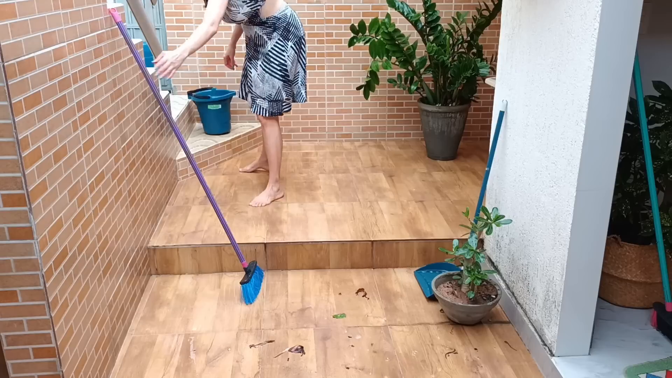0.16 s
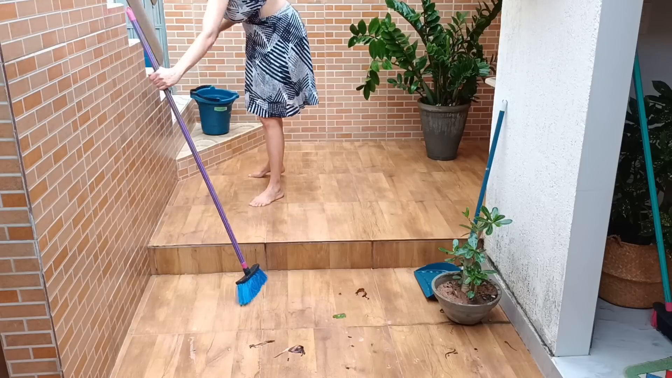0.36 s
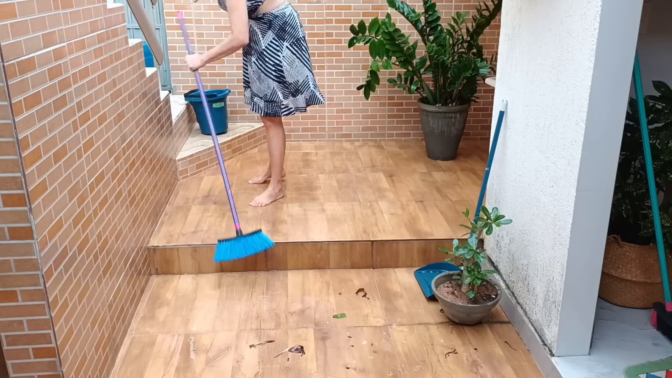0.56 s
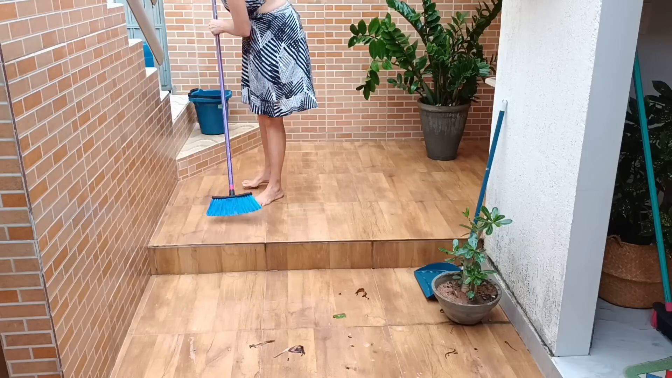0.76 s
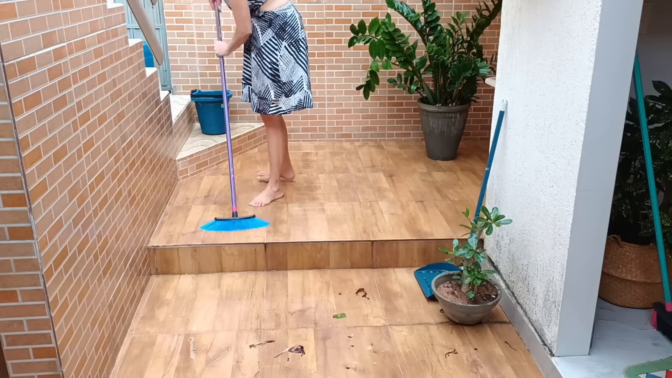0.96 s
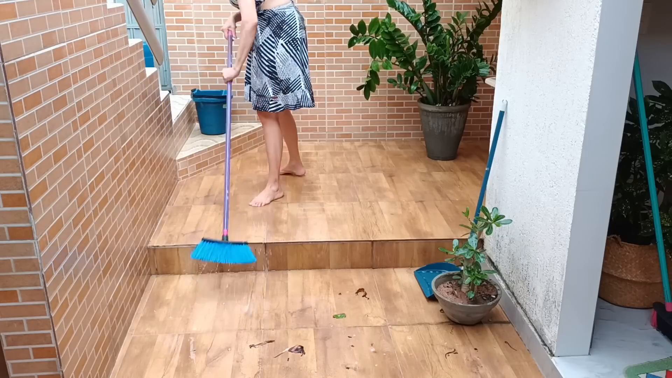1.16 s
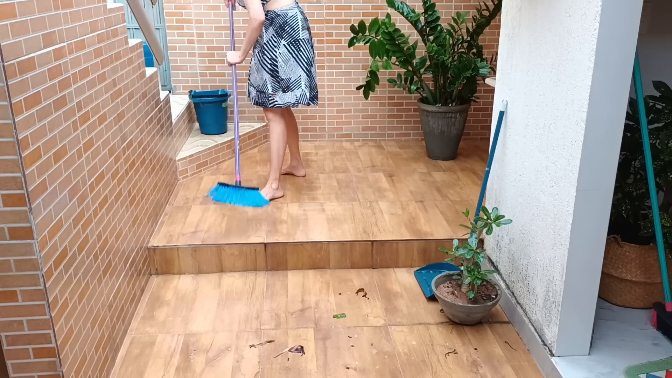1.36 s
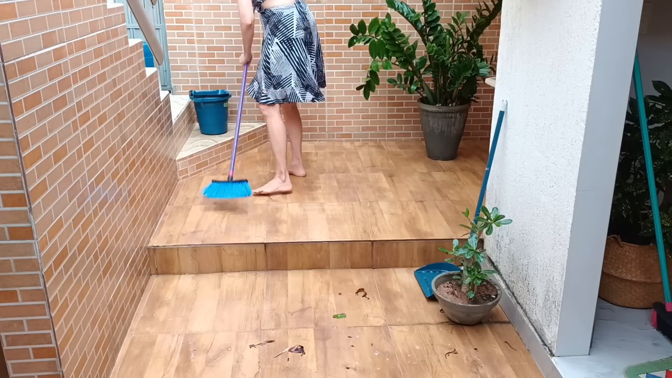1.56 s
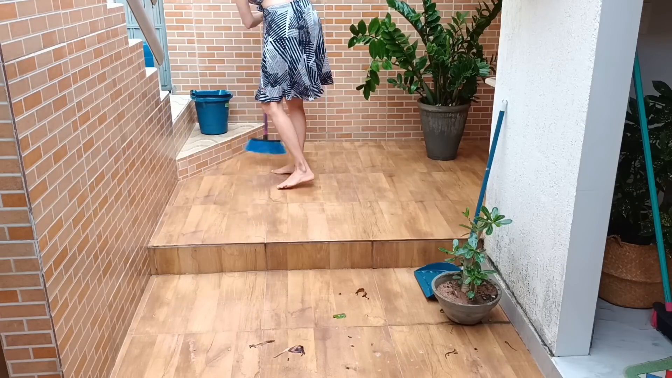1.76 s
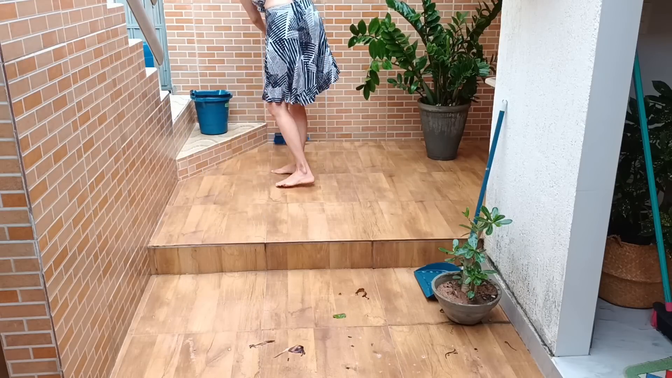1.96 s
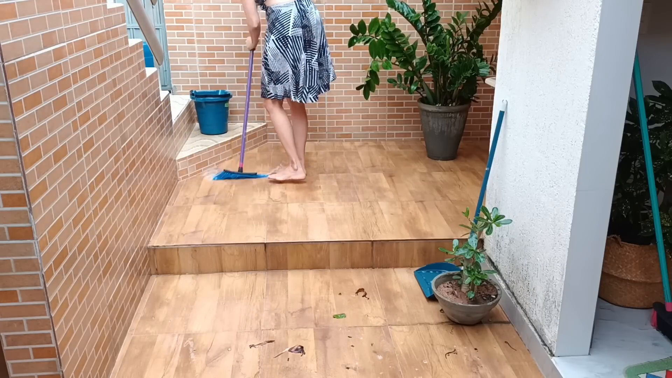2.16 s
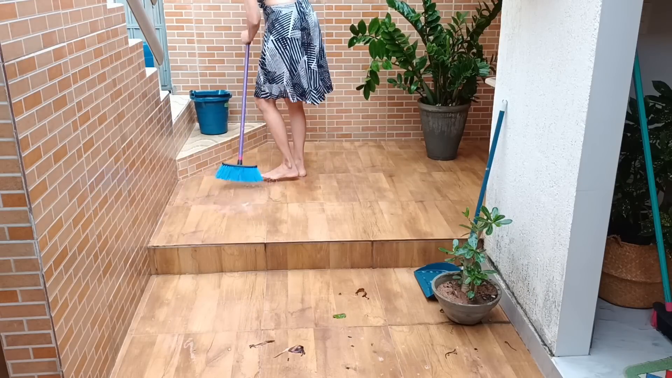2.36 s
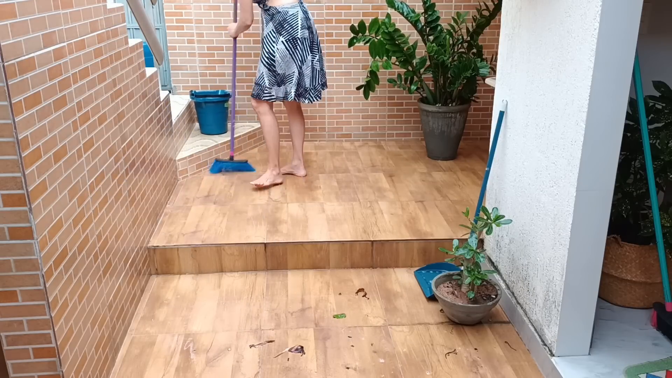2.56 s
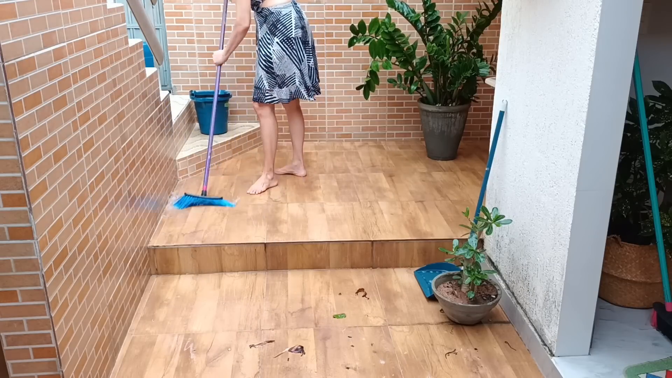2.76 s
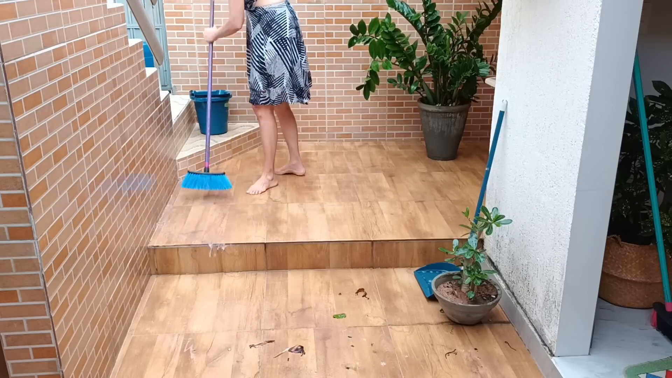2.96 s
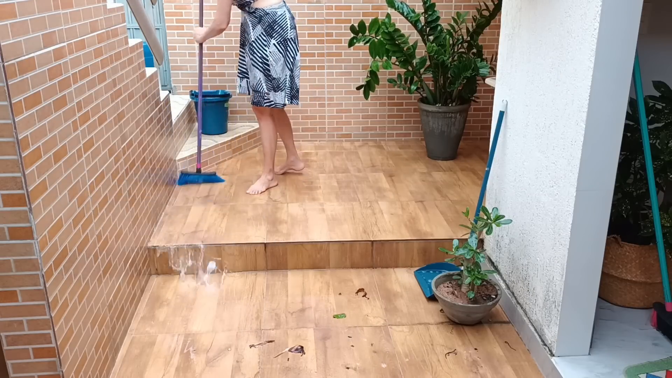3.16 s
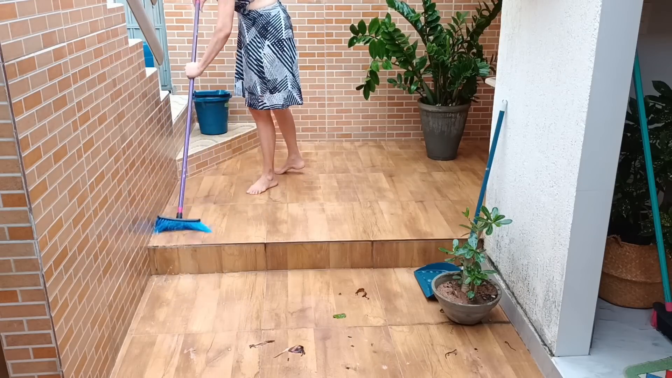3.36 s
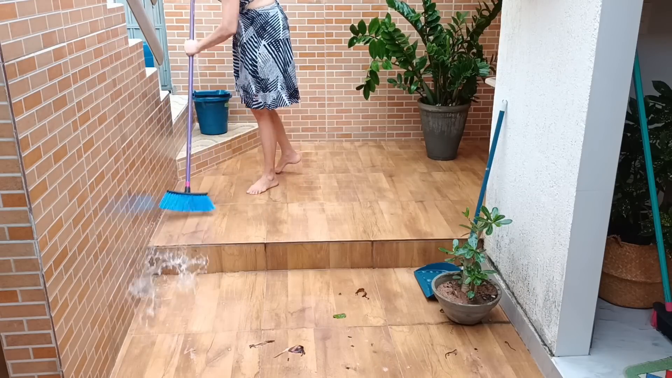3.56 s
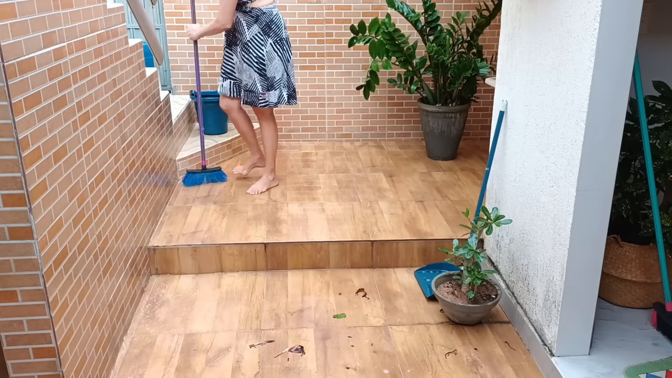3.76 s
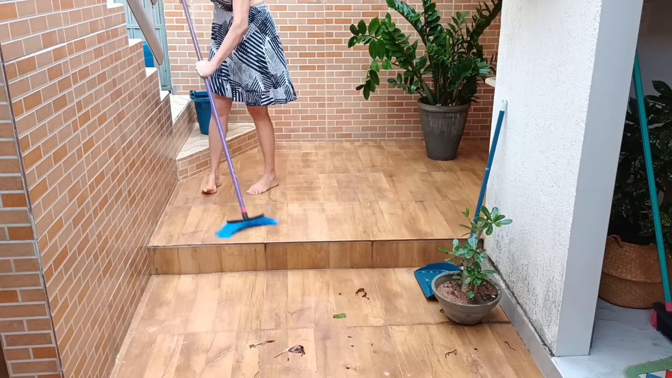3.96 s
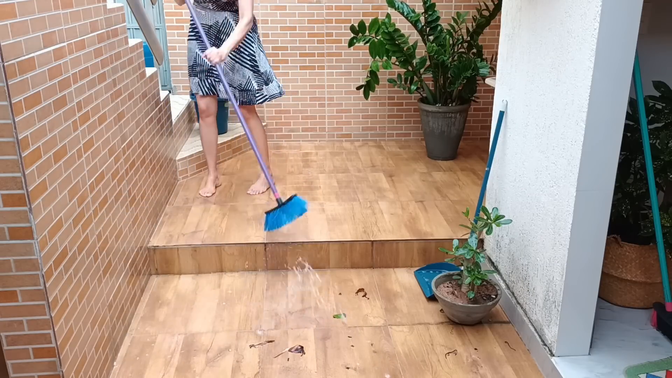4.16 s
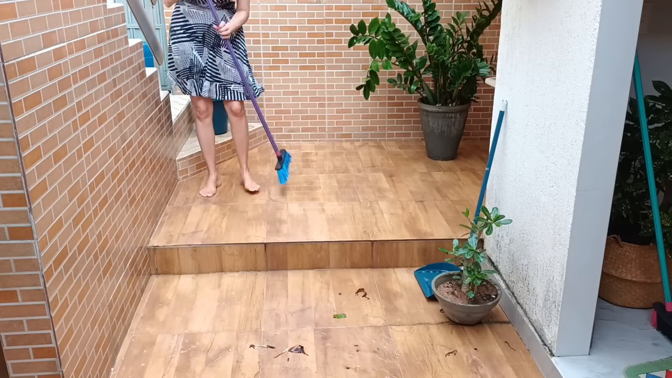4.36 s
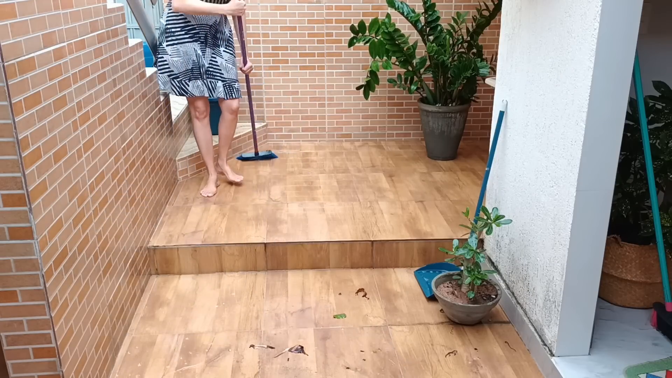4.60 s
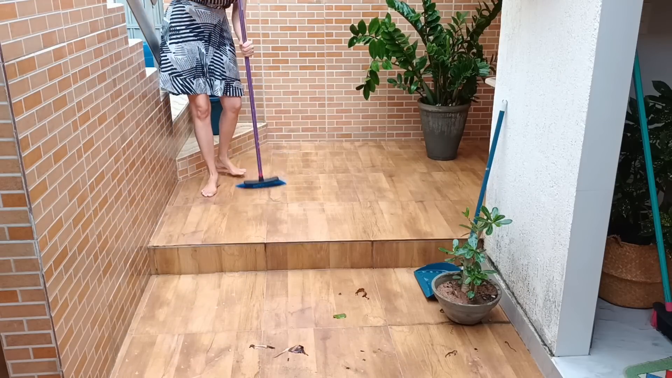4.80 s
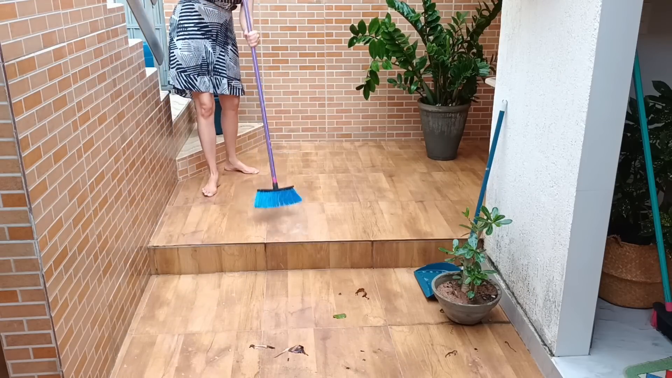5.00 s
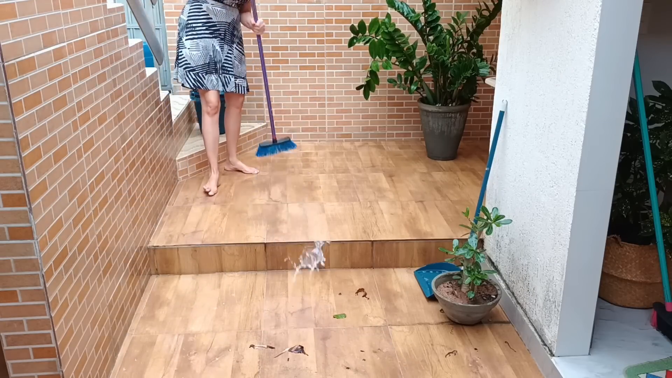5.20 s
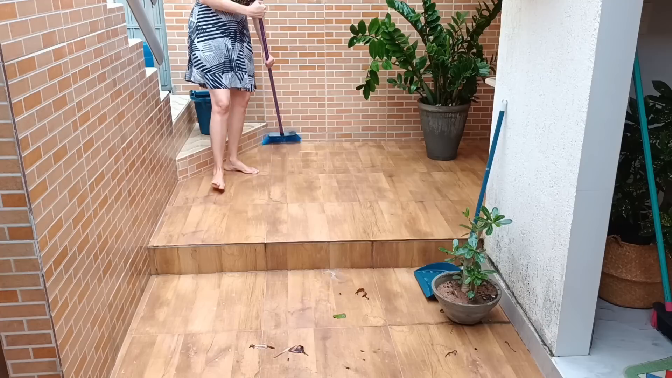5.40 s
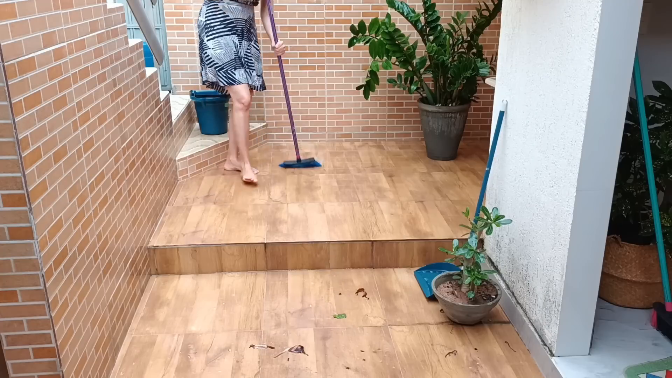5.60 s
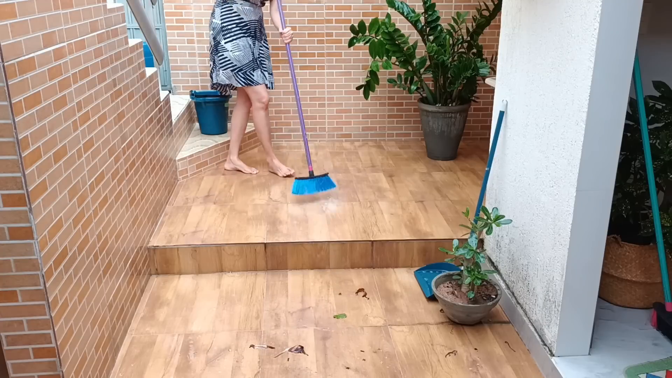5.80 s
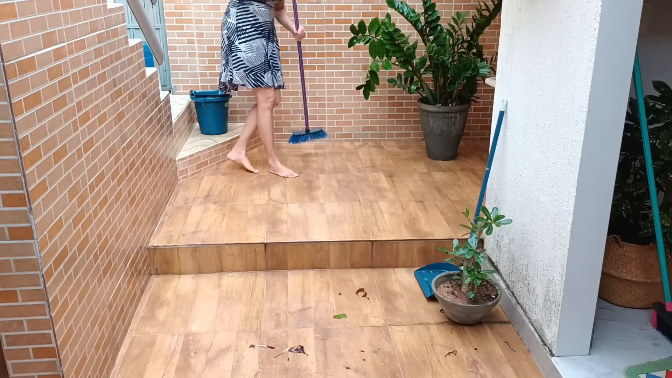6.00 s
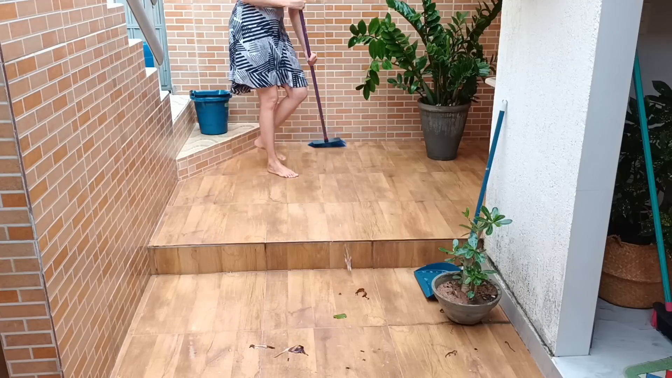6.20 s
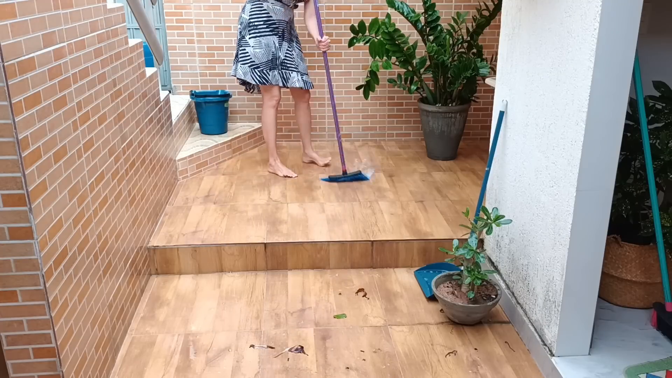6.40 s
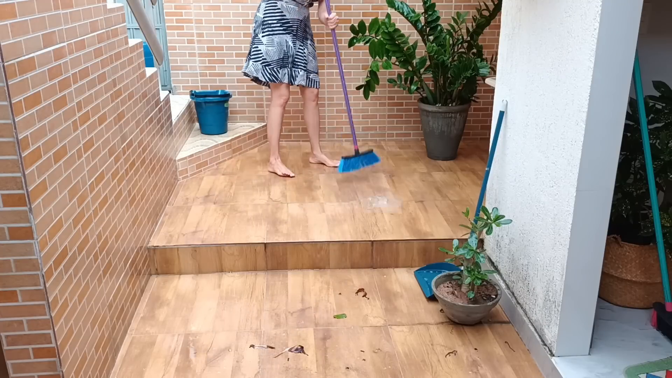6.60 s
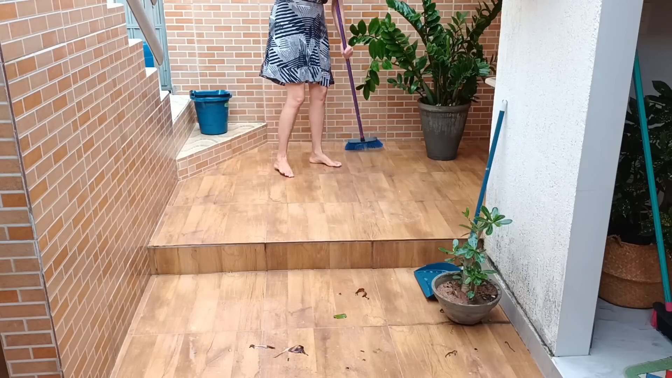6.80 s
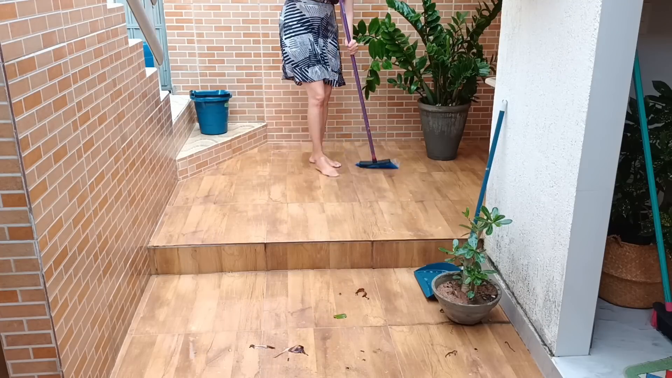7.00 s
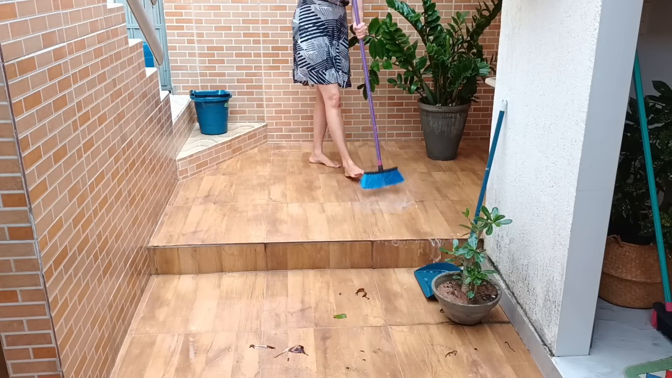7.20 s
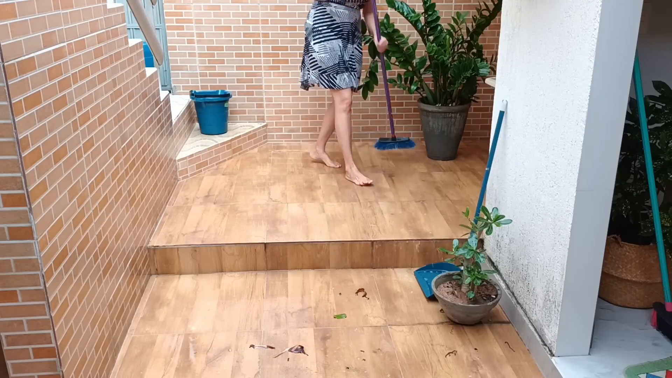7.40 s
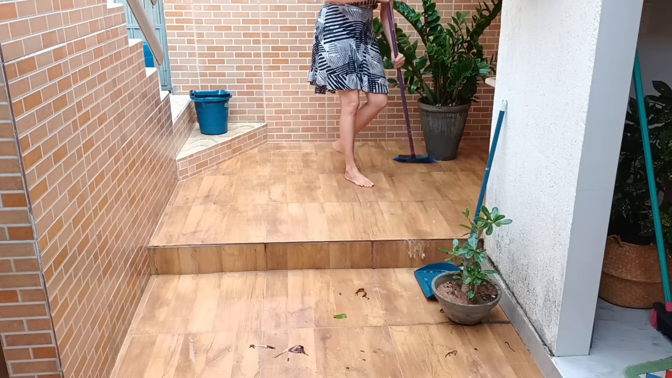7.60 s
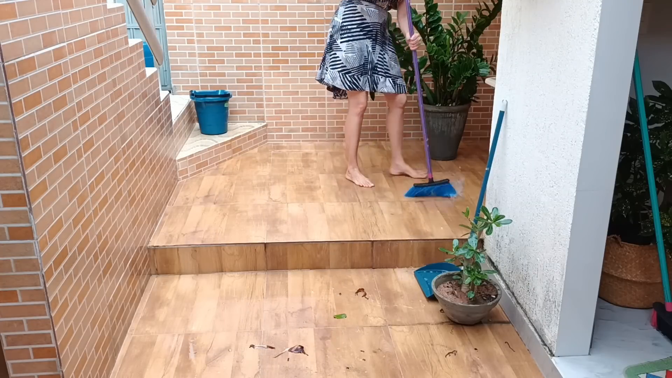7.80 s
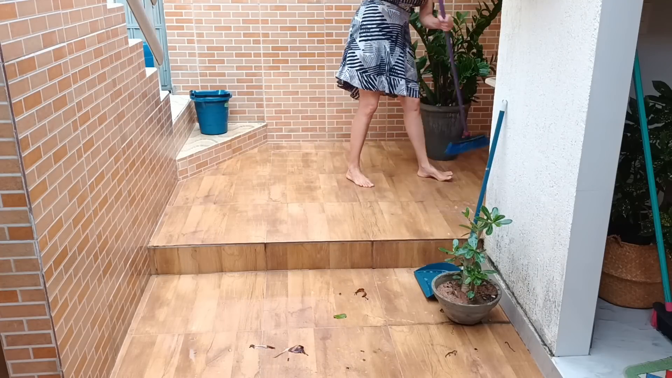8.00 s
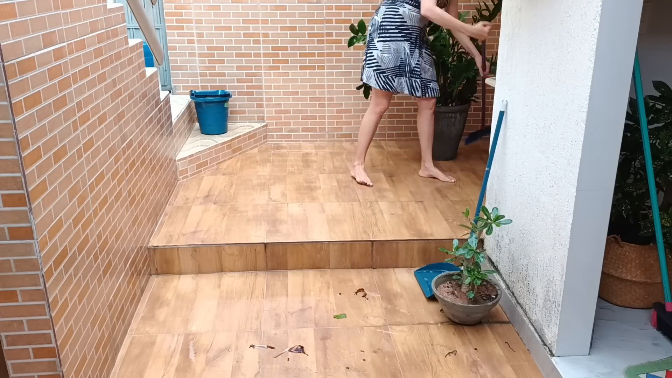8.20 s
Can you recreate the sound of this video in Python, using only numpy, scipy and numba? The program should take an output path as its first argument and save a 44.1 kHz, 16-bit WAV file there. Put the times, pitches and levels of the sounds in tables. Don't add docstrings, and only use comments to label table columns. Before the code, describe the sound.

Wooden furniture scrapes and squeals briefly, then broom strokes swish, slap and push splashing water across hard tile as a distant engine throbs past.

```python
import sys
import numpy as np
from scipy import signal
from scipy.fft import rfft, irfft, next_fast_len
from scipy.io import wavfile
from scipy.ndimage import uniform_filter1d
from numba import njit

SR = 44100
rng = np.random.default_rng(int(sys.argv[2]) if len(sys.argv) > 2 else 0)


def linear_from_db(decibels):
    return 10 ** (np.asarray(decibels, float) / 20)


def transcribe(signal):
    frames = np.atleast_2d(signal).T
    limited = np.clip(frames, -1, 1)
    pcm = np.round(limited * 32767).astype(np.int16)
    wavfile.write(sys.argv[1], SR, pcm)


N = 363825
LEFT_LAG = 40


def level(x, db):
    return x * linear_from_db(db) / np.sqrt(np.mean(x ** 2))


def curves(table):
    s, *columns = np.transpose(table)
    t = np.arange(N) / SR
    gate = (t > s[0]) * np.clip((s[-1] - t) / 0.03, 0, 1)
    return [np.interp(t, s, c) for c in columns] + [gate]


def colour(x, points):
    size = next_fast_len(N)
    hz, db = np.transpose(points)
    bins = np.arange(size // 2 + 1) * SR / size
    gain = linear_from_db(np.interp(np.log(bins + 1), np.log(hz), db))
    return irfft(rfft(x, size) * gain, size)[..., :N]


@njit
def svf(x, hz, width):
    y, band, low = np.empty(len(x)), 0., 0.
    g, k = np.tan(np.pi * hz / SR), width / hz
    for i in range(len(x)):
        v = (band + g * (x[i] - low)) / (1 + g * (g + k))
        band = 2 * v - band
        low = low + 2 * g * v
        y[i] = k * v
    return y


def modes(x, table):
    total = 0
    for k, (hz, width, db) in enumerate(table):
        total = total + (-1) ** k * linear_from_db(db) * svf(x, 1. * hz, 1. * width)
    return total


def walk(rate):
    k = int(SR / rate)
    steps = np.repeat(rng.standard_normal(N // k + 1), k)
    return 1.413 * uniform_filter1d(uniform_filter1d(steps, k), k)[:N]


def slips(rate, spread_db):
    size = linear_from_db(spread_db * rng.exponential(size=N)) * rng.standard_normal(N)
    return size * (rng.random(N) < rate / SR)


def swells(full_s, rise_s, hold_s, db, fall_db_s, rise_db=19.0, gain_db=0.):
    late = np.arange(0, N + 64, 64) / SR - np.reshape(full_s, (-1, 1))
    columns = (rise_s, np.maximum(hold_s, .001), db, gain_db)
    rise, hold, db, gain_db = (np.reshape(v, (-1, 1)) for v in columns)
    early = np.minimum(late, 0) / np.maximum(rise, .002)
    shape = rise_db * (early + 2 * np.minimum(early + 1, 0))
    shape = shape + gain_db * np.clip(late / hold, 0, 1)
    shape = shape - fall_db_s * np.maximum(late - hold, 0)
    total = np.sqrt(np.sum(linear_from_db(db + shape) ** 2, axis=0))
    return np.interp(np.arange(N), np.arange(len(total)) * 64, total)


def alike(shape):
    common, own = rng.standard_normal(shape), rng.standard_normal((2, shape))
    low = signal.butter(2, 500, "low", fs=SR, output="sos")
    high = signal.butter(1, 500, "high", fs=SR, output="sos")
    both = np.array([np.roll(common, LEFT_LAG), common])
    return signal.sosfilt(low, both + 0.096 * own) + signal.sosfilt(high, own)


def street():
    # (time [s], level [dB])
    passing = [(0, -55), (.5, -53), (.7, -50), (1.0, -50.5), (1.5, -42.5), (2.0, -43.5), (3.3, -50.5),
               (3.9, -43), (4.2, -41.5), (4.7, -42.5), (4.9, -35), (5.3, -40), (5.7, -39), (6.3, -36.5),
               (6.7, -46), (7.3, -47.5), (8.25, -48.5)]
    # (time [s], duration [s], throb level [dB])
    surges = [(0.017, .03, -52), (.89, 0.018, -57), (1.077, 0.064, -55), (1.503, 0.023, -43),
              (1.72, .12, -54), (2.27, 0.026, -54), (2.5, 0.31, -56.5), (3.524, 0.055, -40),
              (4.125, .04, -59), (4.282, 0.015, -34), (4.568, 0.099, -39.5), (4.855, 0.024, -30),
              (5.42, .03, -54), (5.693, 0.018, -43), (5.95, 0.029, -51), (6.267, .03, -52),
              (6.656, 0.13, -57), (7.86, .02, -58)]
    # (frequency [Hz], density [dB per Hz])
    town_spectrum = [(88, -42), (150, 1), (309, -1), (439, -4), (790, -7), (1240, -16), (1900, -19),
                     (3700, -19.5), (12700, -34), (16000, -45)]
    road_db = curves(passing)[0]
    s, lasts, db = np.transpose(surges)
    surge = swells(s, 0.094, lasts, db, fall_db_s=113)
    idle = linear_from_db(road_db - 11.5)

    air = alike(N)
    throb = level(colour(air, [(30, -38), (45, -4), (58, 25.0), (72, 18.0), (95, -33)]), -0.45)
    throb = throb / np.sqrt(uniform_filter1d(np.mean(throb ** 2, axis=0), SR // 10) + 0.22)
    road_spectrum = [(60, -28.0), (95, -2.5), (130, -2.5), (170, -7.0), (300, -26.0), (800, -51.0)]
    road = level(colour(air, road_spectrum), -1.55)
    road_gain = linear_from_db(road_db + 1.6 * walk(7)) + 0.34 * surge
    town = level(colour(alike(N), town_spectrum), -47.0) * linear_from_db(0.83 * walk(5.5))
    return (surge + idle) * throb + road_gain * road + town


def furniture():
    # (time [s], duration [s], low body level [dB], high body level [dB], upper panel level [dB])
    shoves = [(.0, 0.025, -36, -35.5, -43.5), (.1, .02, -60, -50, -64), (0.348, 0.054, -63, -48.5, -59),
              (0.632, 0.023, -24, -42, -25), (0.72, 0.051, -41, -28.5, -47), (0.967, .01, -32, -29, -36.5),
              (0.996, 0.22, -55, -31, -56), (1.122, 0.027, -33, -28, -28.5), (1.158, 0.081, -41, -30, -39),
              (1.356, 0.091, -52, -41, -55), (1.589, 0.017, -34.5, -31, -35),
              (1.69, 0.058, -36, -34.5, -33.5), (1.774, 0.11, -44, -37, -41.5),
              (1.886, 0.06, -40, -49, -57), (2.093, 0.011, -61, -65, -43.5)]
    # (frequency [Hz], bandwidth [Hz], level [dB])
    low_body = [(157.5, 5.6, -6.5), (273, 30, -4.5)]
    high_body = [(325.5, 14, -1), (367, 105, -18)]
    upper_panels = [(598, 122, 4.5), (700, 100, 7.5), (945, 190, 0), (1840, 320, -5.5)]
    s, lasts, low_db, high_db, panel_db = np.transpose(shoves)
    rise_s = 0.023
    jolts = slips(rate=600, spread_db=-0.4) + 0.014 * rng.standard_normal(N)
    low = level(modes(modes(jolts, low_body), [(242, 2300, 0)]), 0.72)
    high = level(modes(modes(jolts, high_body), [(326, 180, 0)]), 0.61)
    panels = level(modes(jolts, upper_panels), 1.0)
    low = low * swells(s, rise_s, lasts, low_db, fall_db_s=123)
    high = high * swells(s, rise_s, lasts, high_db, fall_db_s=157)
    panels = panels * swells(s, rise_s, lasts, panel_db, fall_db_s=106)
    return low + high + panels


def pressure():
    # (full pressure [s], rise [s], hold [s], bristle hiss [dB], gain over the hold [dB])
    strokes = [(0.546, 0.046, .01, -32, -3.5), (1.08, 0.076, 0.095, -29, 4),
               (1.358, 0.074, 0.0086, -39, -1.5), (2.189, 0.11, 0.23, -25, -1.5),
               (2.764, 0.08, .16, -25, -1), (3.348, 0.13, 0.17, -22.5, -1.5),
               (3.786, 0.093, 0.0043, -29, -4), (4.025, 0.11, 0.11, -28, 4.5),
               (4.318, 0.13, 0.039, -33, -1.5), (4.935, 0.14, 0.13, -30.5, 7),
               (5.636, 0.063, 0.21, -29, 6.5), (6.393, 0.14, 0.21, -30.5, 5.5),
               (7.141, 0.22, 0.12, -27.5, 5), (7.741, 0.11, 0.19, -31.5, 4)]
    # (time [s], stay [s], hiss level [dB])
    touches = [(.0, 0.12, -63.5), (.3, 0.2, -70), (.48, .02, -50), (.75, .2, -79), (.975, 0.0077, -40),
               (1.585, 0.016, -30.5), (2.09, 0.0058, -54), (2.69, .01, -51), (3.9, 0.048, -40),
               (4.73, 0.12, -49), (5.4, 0.013, -37), (5.51, 0.047, -40.5), (6.0, 0.22, -56),
               (6.26, 0.039, -36.5), (6.96, 0.041, -49), (7.4, 0.11, -47), (7.6, 0.028, -41.5),
               (8.1, .15, -53)]
    # (time [s], tip level [dB])
    dryness = [(.45, 8), (.55, -9), (.9, -6), (1.15, 10.5), (1.4, -11), (1.7, 9.5), (2.3, 3.5), (2.6, 4),
               (2.95, 4), (3.3, 7), (3.8, -8), (3.95, 16.5), (4.2, -2), (4.45, -9), (4.9, 13), (5.15, 1),
               (5.5, 4), (8.2, 1)]
    s, rise, hold, db, gain = np.transpose(strokes)
    push = swells(s, rise, hold, db, fall_db_s=161, rise_db=20.5, gain_db=gain)
    drip = swells(s, rise, hold, db + gain - 21, fall_db_s=51)
    s, stay, db = np.transpose(touches)
    touch = swells(s, 0.016, stay, db, fall_db_s=170)
    total = np.sqrt(push ** 2 + drip ** 2 + touch ** 2 + linear_from_db(-72) ** 2)

    slope = np.clip(np.gradient(20 * np.log10(total)) * SR, -220, 220)
    lag = int(0.026 * SR)
    slope = uniform_filter1d(slope, 2 * lag + 1, origin=lag // 2)
    return total, linear_from_db(-8.5 + curves(dryness)[0] - 0.0033 * slope)


def broom():
    # (frequency [Hz], density [dB per Hz])
    bristle = [(1500, -25), (2500, -18), (4000, -10.5), (5800, 0.5), (7500, 4.5), (9500, 3), (11500, -4),
               (13000, -13.5), (16000, -14.5)]
    water = [(700, -55), (1100, -25), (1640, -7.5), (2030, -4), (2670, -2), (3280, -5), (3860, -5.5),
             (4800, -8), (6500, -10.5), (10000, -34)]
    # (time [s], rasp level [dB])
    bend = [(.4, -6.5), (1.0, -11), (1.5, -4), (2.1, -32), (2.2, -9.5), (2.45, -3.5), (2.7, -13.5),
            (3.0, -6.5), (3.4, -3.5), (3.8, -5.5), (4.1, -15.5), (4.33, 0.5), (4.6, -2), (5.0, -11.5),
            (5.7, -12), (6.5, -7.5), (7.3, -10), (8.2, -8)]
    # (crest [s], build-up [s], crest lasts [s], sheet [dB], deep slosh [dB])
    waves = [(1.58, 0.055, 0.017, -44, -53), (1.728, .05, 0.053, -52, -53),
             (2.077, 0.02, 0.018, -43, -43.5), (2.193, 0.015, 0.17, -43, -52),
             (2.43, .2, 0.063, -37.5, -46), (2.672, .01, 0.097, -38.5, -48), (2.868, 0.15, 0.11, -32, -47),
             (3.217, .008, 0.13, -31, -54), (3.462, 0.21, 0.047, -19, -38),
             (3.812, 0.15, 0.019, -30, -44.5), (4.123, 0.18, 0.055, -38, -50.5),
             (4.325, 0.068, 0.017, -36, -74), (4.73, .01, .01, -48, -61), (5.068, 0.19, 0.11, -41, -52),
             (5.405, 0.03, 0.011, -32.5, -61), (5.495, 0.01, 0.0092, -34, -44),
             (5.845, 0.26, 0.11, -36.5, -53), (6.247, 0.018, 0.0084, -36.5, -40),
             (6.41, 0.054, 0.29, -39, -51), (6.634, 0.47, 0.033, -29, -38.5), (6.795, .05, .1, -51, -55),
             (7.27, 0.31, 0.084, -32, -55), (7.477, 0.079, .01, -35.5, -38.5),
             (7.587, 0.017, 0.025, -39, -44), (7.879, 0.42, 0.18, -32.5, -38.5)]
    press, fine = pressure()
    scrape = slips(rate=9000, spread_db=2.5)
    hiss = level(colour(scrape, bristle), 1.48)
    tip_spectrum = [(6500, -43), (9500, -2.0), (12500, -1.5), (14000, -3.5), (16000, -12.0)]
    tips = level(colour(scrape, tip_spectrum), 1.2) * fine
    rasp_spectrum = [(1700, -34), (2500, -6.5), (4000, -0.5), (5500, -4.5), (8000, -22)]
    rasp = level(colour(scrape, rasp_spectrum), 0.091) * linear_from_db(curves(bend)[0])

    s, build, crest, sheet_db, slosh_db = np.transpose(waves)
    flow = swells(s, build, crest, sheet_db, fall_db_s=120, rise_db=18) + linear_from_db(-93)
    deep = swells(s, np.minimum(build, 0.072), crest, slosh_db, fall_db_s=64, rise_db=18) + linear_from_db(-59.5)
    sheet = level(colour(slips(rate=4000, spread_db=3.0), water), 0.72)
    sheet = sheet * flow * linear_from_db(2.1 * walk(22))
    pockets = slips(rate=2500, spread_db=0.5)
    slosh = level(svf(svf(pockets, 1410.0, 1260.0), 1410.0, 1260.0), -0.93)
    slosh = slosh * deep * linear_from_db(1.14 * walk(22))
    return press * linear_from_db(0.67 * walk(25)) * (hiss + tips + rasp) + sheet + slosh


def slaps():
    # (time [s], peak [dB], ring [Hz], t60 [s], splash against ring [dB])
    head_slaps = [(.084, -35, 3440, 0.29, -3), (.236, -36, 3940, 0.1, -10), (.444, -46, 3000, .1, 7),
                  (1.586, -22.5, 1490, 0.25, -6), (1.844, -42.5, 2500, 0.19, 10.5),
                  (2.188, -17, 4400, .15, -1), (2.078, -20.5, 1910, 0.15, 2.5),
                  (2.679, -20.5, 1560, 0.32, -5), (3.2178, -9, 1060, 0.43, -28),
                  (3.219, -9, 2100, 0.17, -30), (3.771, -11.5, 4000, 0.21, -0.5), (4.312, -32, 3300, .3, 5),
                  (5.52, -29.5, 700, 0.83, -30), (5.383, -29, 2600, 0.25, 3.5), (5.4, -27.5, 2344, 0.11, 8),
                  (6.163, -51.5, 2200, 0.25, 18.5), (6.238, -28, 2000, 0.24, 3),
                  (3.2186, -21.5, 514, 0.36, -30), (7.586, -17.5, 2260, .17, -10),
                  (7.596, -17.5, 2130, 0.086, -15), (7.469, -23.5, 2150, 0.1, -20)]
    # (time [s], peak [dB], ring [Hz], t60 [s], splash against ring [dB])
    foot_pats = [(0.349, -37.5, 1880, 0.64, -14), (2.45, -28.5, 700, 0.55, -30),
                 (4.73, -34, 1300, 0.44, 7.5), (1.275, -28, 980, 1, -30), (3.737, -17.5, 3300, 0.18, 2.5),
                 (5.498, -25, 1530, 0.4, 2), (6.739, -49, 397, 0.92, -30), (6.869, -37, 326, 1, -30),
                 (6.259, -18, 1420, 0.13, -8), (6.517, -19.5, 1820, 0.23, -2),
                 (6.85, -25.5, 1070, 0.35, -21), (6.936, -36.5, 1110, 0.58, 11.5),
                 (7.457, -17, 1390, 0.47, -29), (7.65, -23, 1450, 0.15, -5)]
    # ring width over pitch, rise [s]; a slap rings broadly, a pat narrowly
    events = [r + (0.79, 0.0013) for r in head_slaps] + [r + (0.42, 0.0035) for r in foot_pats]
    out, t = np.zeros(N + SR), np.arange(SR // 2) / SR
    blow = np.exp(-t / 0.0011)
    for s, db, hz, t60, spray_db, wide, rise in events:
        noise = rng.standard_normal((2, len(t)))
        fade = np.exp(-np.log(1000) * t / np.clip(t60, .01, 1))
        width = hz * np.clip(wide, .1, 2)
        ring = svf(svf(noise[0] * (fade + 2.0 * blow), 1. * hz, width), 1. * hz, width)
        ring = ring * np.sqrt(SR / width) * linear_from_db(-10.5)
        crack = svf(noise[0] * blow, 2.5 * hz, 0.49 * hz) * linear_from_db(-4.0)
        spray = svf(noise[1] * (fade ** 2.16 + 0.49 * blow), 6700.0, 13000.0) * linear_from_db(spray_db + 1.0)
        start = int(s * SR)
        out[start:start + len(t)] += linear_from_db(db - 2.5) * (ring + crack + spray) * np.clip(t / rise, 0, 1)
    return out[:N]


def squeal():
    # (time [s], slip rate [Hz], level [dB])
    squeals = [(.58, 223.5, -54), (.61, 226.2, -46), (.635, 232.6, -40), (.665, 235.7, -41.5),
               (.728, 241.2, -37), (.814, 248.3, -35.5), (.872, 246.1, -35), (.936, 245.1, -36),
               (.984, 241.3, -31.5), (1.05, 240.3, -36.5), (1.096, 235.6, -36.5), (1.19, 231.6, -37.5),
               (1.36, 230.8, -42.5), (1.52, 231, -58)]
    # (time [s], share of slips that scatter [0-1])
    uneven = [
        (.56, .4),
        (.7, .25),
        (.77, .14),
        (.86, .09),
        (.94, .1),
        (1.0, .3),
        (1.1, .52),
        (1.52, .6),
    ]
    # (frequency [Hz], gain [dB])
    leg_response = [(200, -23), (750, -14.5), (980, -4), (1220, -7), (1470, -12), (1720, -10.5),
                    (1960, -8.5), (2200, -7), (2440, 3.5), (2590, -15), (2730, -2), (3100, -7),
                    (3900, -12.5), (4400, -21.5), (5500, -26), (8000, -45)]
    hz, db, on = curves(squeals)
    share = curves(uneven)[0]
    turns = np.cumsum(hz * (1 + .011 * share * walk(60))) / SR
    clean = 0
    for k in range(1, 36):
        clean = clean + np.cos(2 * np.pi * (k * turns + rng.random())) * linear_from_db(2.6 * walk(32.))
    rough = 22 * rng.standard_normal(N) * np.exp(-(turns % 1) / .3)
    leg = colour((1 - share) * clean + share * rough, leg_response)
    even = leg / np.sqrt(uniform_filter1d(leg ** 2, SR // 8))
    even = even + level(svf(rng.standard_normal(N), 4300.0, 3500.), -27)
    return even * linear_from_db(db + 5.0 + 1.0 * walk(25.1)) * on


def taps():
    # (time [s], peak [dB], ring [Hz], t60 [s])
    knocks = [(1.278, -28, 1043, 0.1), (3.2192, -18, 1900, .02), (3.2194, -19, 980, .03),
              (3.247, -22, 1237, .06), (3.27, -25, 1910, .15), (5.498, -33, 1124, .2),
              (6.2607, -15.5, 1300, 0.018), (6.267, -30, 1390, .04), (6.296, -31, 1410, 0.037),
              (6.795, -32, 1120, 0.07), (6.853, -32, 1050, .05), (6.866, -28, 1130, .07),
              (6.878, -34, 1200, .08), (6.91, -39, 1100, .15), (7.458, -28, 1350, .04),
              (7.468, -27, 2200, .02), (7.476, -23, 1210, .04), (7.499, -22, 1220, .045),
              (7.518, -27, 1200, 0.05), (7.587, -28, 2100, .025), (7.5955, -20, 2000, .015),
              (7.5965, -23, 2800, .015), (7.653, -25, 1470, .045), (7.67, -36, 1420, .06),
              (7.72, -42, 1500, .08)]
    # (time [s], peak [dB], ring [Hz], t60 [s])
    bumps = [(.63, -27, 805, .08), (.642, -20.5, 267.6, 0.27), (.646, -23, 1210, 0.042),
             (.652, -21, 624, 0.12), (.658, -25, 974, .08), (.692, -24, 1760, .08),
             (.696, -27, 1200, 0.062), (.72, -25, 270, .2), (.735, -20.5, 593, .12), (.755, -25, 2210, .1),
             (.972, -28, 330, .3), (1.0, -29, 340, 0.16), (1.04, -28, 2390, .08), (1.061, -29, 325, .2),
             (1.118, -30, 700, .1), (1.145, -23, 324, .3), (1.156, -24, 1770, 0.057),
             (1.19, -25, 320.6, 0.55), (1.226, -27, 323, .3), (1.255, -23, 319, .25),
             (1.32, -36, 980, 0.11), (1.365, -34.5, 980, 0.18), (1.42, -37, 1000, .12),
             (1.588, -19, 275, .15), (1.613, -23, 326, 0.15), (1.677, -25, 324, 0.17),
             (1.695, -31, 725, 0.13), (1.7, -32, 1150, .08), (1.715, -29, 293, 0.12),
             (1.735, -33, 1206, .08), (1.74, -32, 718, .12), (1.76, -24, 321, 0.13), (1.77, -34, 740, .1),
             (1.816, -23, 277, 0.16), (1.835, -26, 326, 0.17), (1.87, -41, 300, 0.13),
             (1.94, -32, 290, .15)]
    out, t = np.zeros(N + SR), np.arange(SR // 4) / SR
    for s, db, hz, t60 in knocks + bumps:
        rise = 1 - np.exp(-t * hz / 1.2)
        fade = np.exp(-np.log(1000) * t / np.clip(t60, .01, .5))
        ring = np.sin(2 * np.pi * hz * (t + 0.2 * t ** 2))
        start = int(s * SR)
        out[start:start + len(t)] += linear_from_db(db - 0.5) * rise * fade * ring
    return out[:N]


def loose_part():
    # (time [s], frequency [Hz], level [dB])
    rings = [(.94, 1810, -60), (1.0, 1860, -52), (1.09, 1845, -50), (1.2, 1840, -55), (1.26, 1840, -39),
             (1.3, 1830, -49), (1.34, 1840, -42), (1.43, 1854, -44), (1.48, 1850, -51), (1.52, 1848, -44),
             (1.59, 1840, -66)]
    hz, db, on = curves(rings)
    shake_db = 3.5 * walk(70.)
    turns = np.cumsum(hz * (1 + 0.0033 * walk(49.7))) / SR
    return np.sin(2 * np.pi * turns) * linear_from_db(db + 3.0 + shake_db) * on


def gears():
    # (time [s], frequency [Hz], level [dB])
    whine = [
        (4.8, 385, -66),
        (4.97, 390, -61.5),
        (5.17, 420, -53),
        (5.35, 425, -65.5),
        (5.7, 420, -57.5),
        (6.1, 450, -60),
        (6.25, 455, -52),
        (6.4, 460, -64),
        (6.7, 468, -57),
        (6.95, 470, -68),
    ]
    hz, db, on = curves(whine)
    turns = np.cumsum(hz * (1 + 0.01 * walk(20))) / SR
    note = np.sin(2 * np.pi * turns) * linear_from_db(db + 7.5 + 3.3 * walk(13)) * on
    return np.array([np.roll(note, LEFT_LAG), note])


def patio(x, dwell_s, direct_db, count=8):
    t, size, total = np.arange(SR // 3) / SR, next_fast_len(N + SR), 0
    place = np.arange(N) / SR / dwell_s
    for k in range(count):
        distance = (place - k + count / 2) % count - count / 2
        here = np.cos(np.pi / 2 * np.clip(distance, -1, 1))
        fade = np.exp(-np.log(1000) * t / 0.26)
        echoes = alike(len(t)) * fade * np.clip(t / 0.00059, 0, 1)
        echoes /= np.sqrt(np.sum(echoes ** 2, axis=1, keepdims=True))
        echoes[[0, 1], [LEFT_LAG, 0]] += linear_from_db(direct_db)
        total = total + rfft(x * here, size) * rfft(echoes, size)
    return irfft(total, size)[:, :N]


def scene():
    spread = patio(broom(), dwell_s=.012, direct_db=-18)
    blows = patio(furniture() + slaps(), dwell_s=.03, direct_db=-6.5, count=6) * linear_from_db(-2.15)
    tones = patio(squeal(), dwell_s=.07, direct_db=7.0, count=3) * linear_from_db(-8.0)
    rings = patio(taps() + loose_part(), dwell_s=.05, direct_db=7.5, count=3) * linear_from_db(-9)
    return spread + blows + tones + rings + street() + gears()


def low_pass(x):
    return signal.sosfilt(signal.butter(12, 16880, fs=SR, output="sos"), x)


def record(dry):
    # (frequency [Hz], left minus right [dB])
    balance = [(60, 6.5), (110, 9), (200, 8), (380, 8), (700, 9.5), (1290, 10.5), (2380, 12), (4400, 3.5),
               (8120, -2), (15000, 0)]
    hz, db = np.transpose(balance)
    left = colour(dry[0], list(zip(hz, db / 2 - 1.5)))
    right = colour(dry[1], list(zip(hz, -db / 2 - 1.5)))
    ports = colour(np.array([left, right]), [(15790, 0), (15850, -120)])
    return low_pass(ports)


dry = scene()
out = record(dry)
transcribe(out)
```